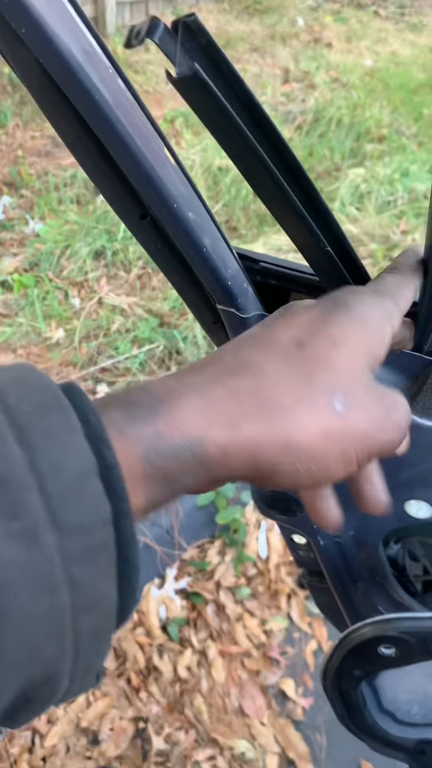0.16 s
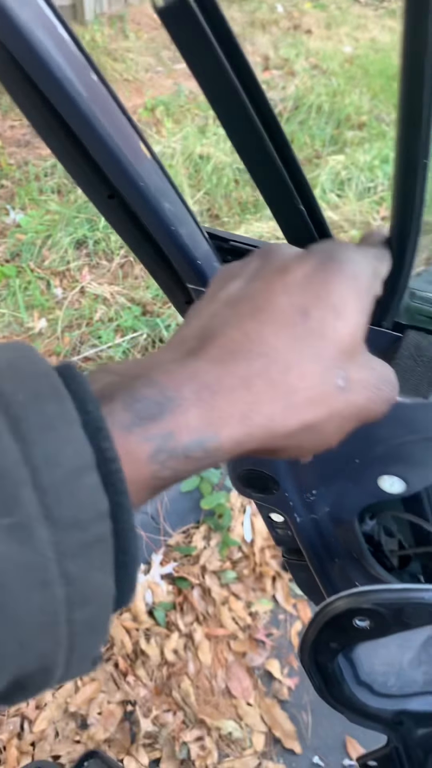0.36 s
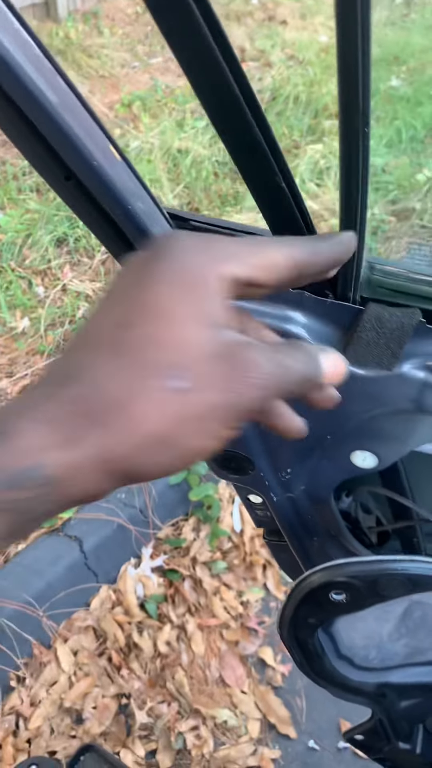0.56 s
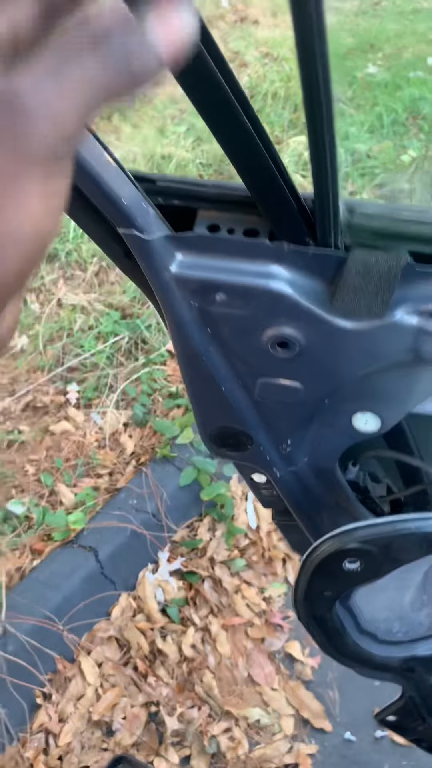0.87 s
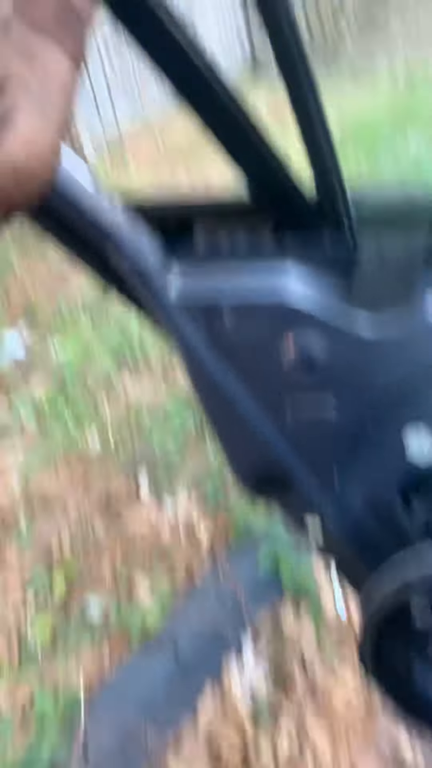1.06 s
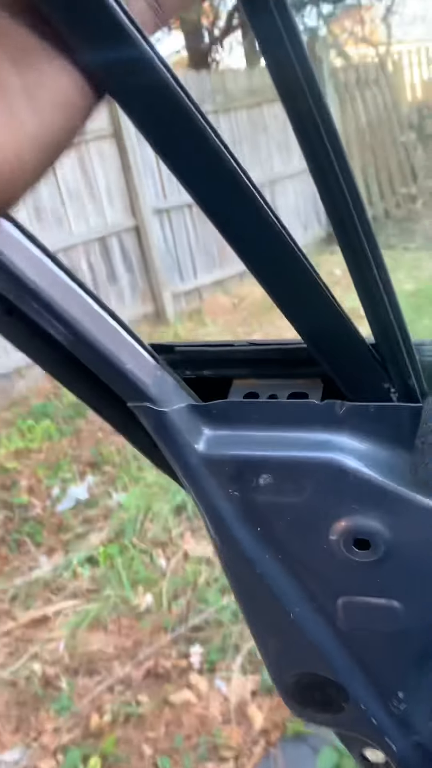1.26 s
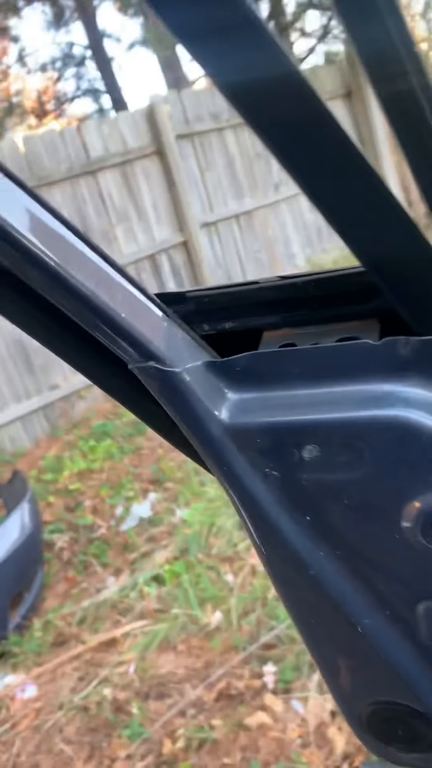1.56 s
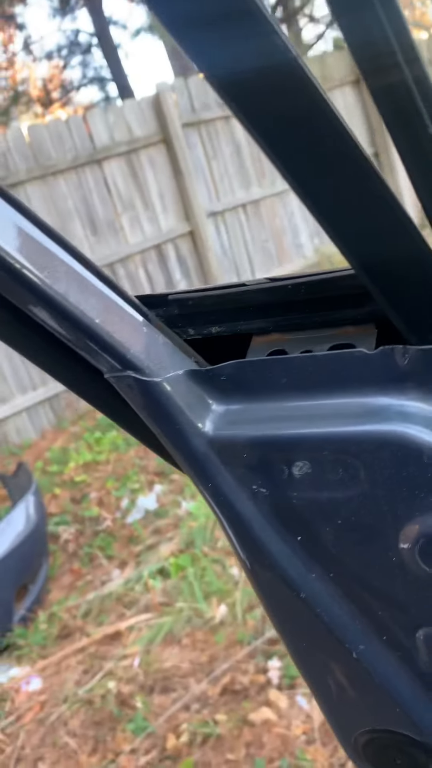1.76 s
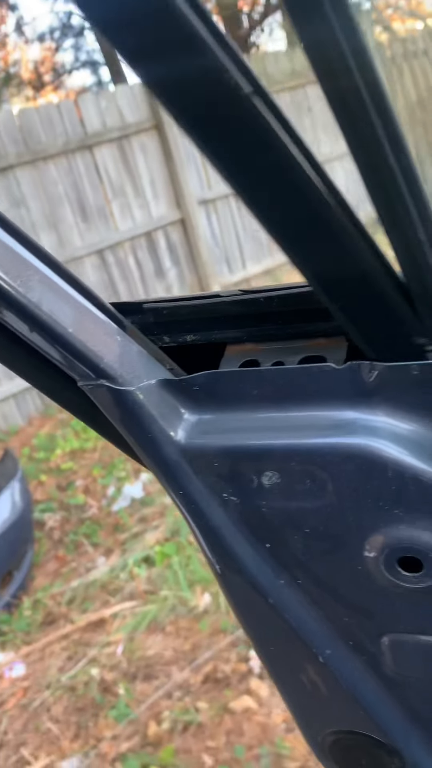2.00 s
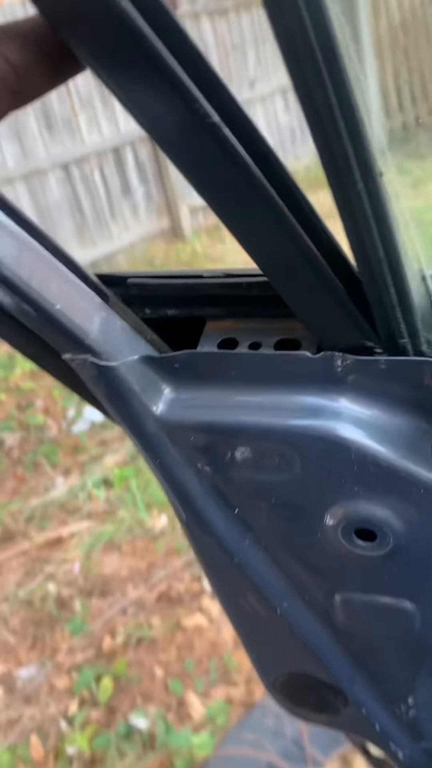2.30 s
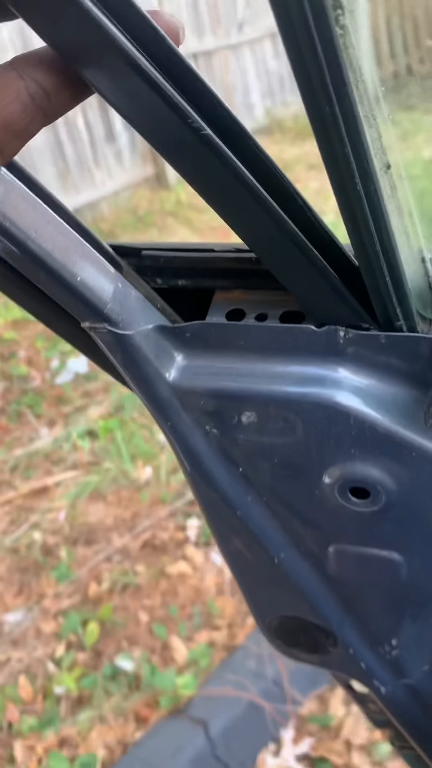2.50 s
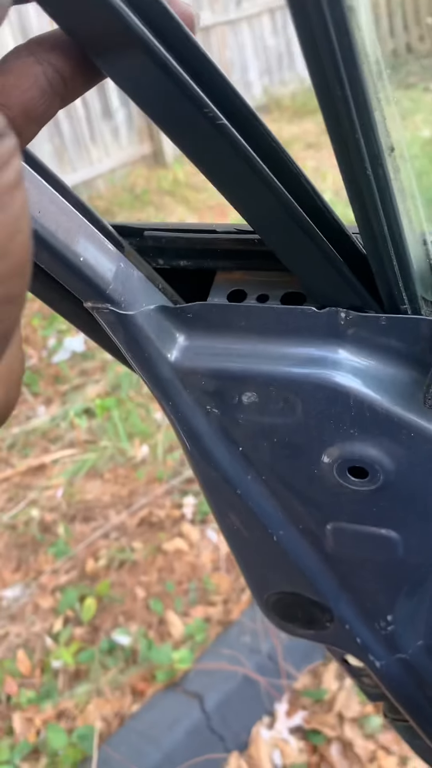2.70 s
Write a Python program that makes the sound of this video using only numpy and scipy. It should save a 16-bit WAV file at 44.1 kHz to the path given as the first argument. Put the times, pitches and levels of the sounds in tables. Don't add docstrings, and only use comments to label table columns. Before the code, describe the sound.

A car door's window channel is tugged by hand: dull hollow knocks early, quieter rubber scraping midway, then firm clicks and thuds; close phone microphone outdoors, faint traffic rumble behind.

```python
import sys
import numpy as np
from scipy import signal
from scipy.fft import rfft, irfft, next_fast_len
from scipy.io import wavfile
from scipy.ndimage import uniform_filter1d, map_coordinates

SR = 44100
rng = np.random.default_rng(int(sys.argv[2]) if len(sys.argv) > 2 else 0)


def waveform_to_disk(signal):
    frames = np.transpose(np.atleast_2d(signal))
    scaled = np.clip(frames, -1, 1) * 32767
    samples = np.round(scaled).astype(np.int16)
    wavfile.write(sys.argv[1], SR, samples)


def gain_from_db(level_db):
    decades = np.asarray(level_db, float) / 20
    return 10 ** decades


N = 125685


def unit(x):
    return x / np.sqrt(np.mean(x ** 2) + 1e-20)


def along(points, hz):
    f, value = np.transpose(points)
    return np.interp(np.log(hz + 1), np.log(f + 1), value)


def wobble(rate):
    knots = rng.standard_normal(int(N * 4000 / SR) + 4)
    return map_coordinates(knots, [np.arange(N) * rate / SR])


def filtered(x, response):
    size = next_fast_len(N + 8192)
    spectrum = rfft(x, size) * response(np.fft.rfftfreq(size, 1 / SR))
    return irfft(spectrum, size)[..., :N]


def coloured(spectrum, grit_db=0, lifts=(), patch_db=0):
    def response(hz):
        lift = sum(db / (1 + ((hz - centre) / width) ** 2) for centre, width, db in lifts)
        return gain_from_db(along(spectrum, hz) + lift)

    cells = signal.stft(rng.standard_normal(N), nperseg=512)[2]
    patches = uniform_filter1d(rng.standard_normal(cells.shape), size=3, axis=0)
    patches = unit(uniform_filter1d(patches, size=8, axis=1))
    noise = signal.istft(cells * gain_from_db(patch_db * patches), nperseg=512)[1][:N]
    return unit(filtered(noise * gain_from_db(grit_db * wobble(1500)), response))


def ring(hz, db, t60, scatter_db, t, spread=0):
    db = db + scatter_db * rng.standard_normal(len(hz))
    decay = gain_from_db(db[:, None] - 60 * t / t60[:, None])
    phase = spread * rng.standard_normal((len(hz), 1))
    return np.sum(decay * np.sin(2 * np.pi * hz[:, None] * t + phase), axis=0)


# t/s, level/dB, sheet clatter/dB, tilt/(dB per half octave)
BLOWS = [(.207, -36, 7, -12.5), (.215, -22.5, -6.5, -3.5), (0.239, -41, -19, 3), (.257, -33, -18, 0.5),
         (.275, -31.5, -23, -5), (.352, -25, 9, 4), (.361, -11, -9.5, 1), (.403, -30, -13, 2.5),
         (.434, -31, -11, -7), (0.547, -33.5, 12, 2), (.556, -16, -7.5, 1.5), (.612, -25.5, -21, 0),
         (.935, -32.5, -1.5, 2), (0.951, -29, -6, 3.5), (1.18, -33, 0.5, 4.5), (1.625, -32.5, -4, 1.5),
         (1.648, -29, -10, 2), (1.689, -33.5, -0.5, -2), (2.055, -30, 1.5, 7), (2.149, -22, 0.5, 2.5),
         (2.168, -25.5, -8, 3), (2.182, -25, -22, -6), (2.196, -25.5, -27, 2.5), (2.357, -28.5, 3, 5),
         (2.505, -28, 2.5, 6.5), (2.522, -26.5, -27, 0), (2.549, -33, -20, -8.5), (2.699, -44.5, 10, 11),
         (.3775, -23, -12, -2.5), (.765, -38, -18, -5), (.885, -41, -3, 6.5), (1.5, -36.5, -2, 2),
         (1.56, -35.5, -11, 2), (.495, -38.5, -14, 2)]
# f/Hz, level/dB, t60/s
SHELL_MODES = [(109, -14.5, 0.17), (147, -16, 0.12), (174.6, -3.5, 0.14), (191.4, -3, 0.14),
               (234.4, -17, 0.22), (260.5, -13, 0.22), (362.6, -17.5, 0.073), (435.6, -16, 0.076)]
# f/Hz, level/dB, t60/s
SHEET_MODES = [(300.5, -16, 0.15), (542, -23, 0.15), (950, -20.5, 0.16), (1234, -29.5, 0.077),
               (2000, -29, 0.072)]


def thuds():
    swell_s, scatter_db, crowd_size = 0.0021, 2, 40
    out, t = np.zeros(N + SR), np.arange(SR // 6) / SR
    hz, mode_db, t60 = np.transpose(SHELL_MODES)
    sheet = np.array(SHEET_MODES)
    lowest, highest = sheet[0, 0], sheet[-1, 0]
    fade = np.clip(20 * (t[-1] - t), 0, 1) ** .5
    envelope = (1 - np.exp(-t / swell_s)) ** 2 * fade
    for s, db, sheet_db, tilt in BLOWS:
        low = ring(hz, mode_db + tilt * 2 * np.log2(hz / hz[3]), t60, scatter_db, t)
        places = (np.arange(crowd_size) + rng.random(size=crowd_size)) / crowd_size
        crowd = lowest + (highest - lowest) * places
        crowd_db, crowd_t60 = along(sheet[:, :2], crowd), along(sheet[:, ::2], crowd)
        high = ring(crowd, sheet_db + crowd_db, crowd_t60, scatter_db, t, np.pi)
        out[round(s * SR):][:len(t)] += gain_from_db(db) * (low + high) * envelope
    return out[:N]


# start t/s, length/s, f/Hz, level/dB
SWAY_SWINGS = [(.21, 0.086, 66, -41), (.58, 0.11, 101, -42.5), (2.2, 0.071, 115, -33.5),
               (2.29, 0.056, 100, -40), (2.5, 0.14, 66, -33.5), (1.43, 0.184, 101, -47.5),
               (.385, 0.0544, 262.4, -30.5), (.572, 0.073, 260, -33), (.356, 0.035, 426, -38.5),
               (.25, 0.053, 210, -37), (.7, 0.047, 258, -41), (1.83, 0.067, 71.4, -40),
               (.208, .03, 165, -31), (1.63, .05, 190, -38), (2.045, .04, 435, -44), (1.62, .05, 355, -46)]


def sways():
    t, out = np.arange(N) / SR, 0
    for s, length, hz, db in SWAY_SWINGS:
        swell = np.sin(np.pi * np.clip((t - s) / length, 0, 1))
        out = out + gain_from_db(db) * swell * np.sin(2 * np.pi * hz * (t - s))
    return out


def blend(dull, a, b):
    dull = np.clip(dull, 0, 1)
    return np.sqrt(1 - dull) * a + np.sqrt(dull) * b


# t/s, level/dB, t60/s, dullness/(0-1)
CHANNEL_HITS = [
    (0.346, -20.5, 0.03, 0.6),
    (0.54, -34.5, 0.07, 0.3),
    (.678, -43, 0.031, 0.82),
    (2.142, -25.5, 0.03, 0.57),
    (2.348, -26.5, 0.034, 0.57),
    (2.495, -41, 0.055, 0.57),
    (1, -50, 0.033, 0.96),
    (2.5, -54, 0.037, .8),
]
# f/Hz, level/dB, t60/s
CHANNEL_MODES = [(2430, -6, .04), (2820, 0, .05), (3320, -3, .04), (5300, -2, .025), (6550, -6, .04),
                 (7500, -8, .03)]
# f/Hz, level/dB
BRIGHT_COLOUR = [(500, 0), (1500, -1.5), (3000, -2), (5000, 0.5), (8000, 2), (12000, -1.5), (16000, -8)]
# f/Hz, level/dB
DULL_COLOUR = [(500, -20), (1500, -12), (2500, -2), (3300, 0), (4600, -4), (7000, -12), (11000, -20),
               (16000, -26)]


def clicks():
    ring_db, rise_s, scatter_db, detune = -11, .002, 3, .015
    out, t = np.zeros(N + SR), np.arange(SR // 8) / SR
    bright, dull = coloured(BRIGHT_COLOUR, grit_db=2.5), coloured(DULL_COLOUR)
    hz, mode_db, life = np.transpose(CHANNEL_MODES)
    for s, db, t60, dullness in CHANNEL_HITS:
        i = round(s * SR)
        crack = blend(dullness, bright[i:][:len(t)], dull[i:][:len(t)]) * gain_from_db(-60 * t / t60)
        bent_hz = hz * (1 + detune * rng.standard_normal(len(hz)))
        tone = gain_from_db(ring_db) * ring(bent_hz, mode_db, life, scatter_db, t)
        out[i:][:len(t)] += gain_from_db(db) * (crack + tone) * (1 - np.exp(-t / rise_s))
    return out[:N]


# start t/s, length/s, level/dB, dullness/(0-1)
RUBBER_STROKES = [(0.164, 0.076, -53.5, 0.22), (0.223, 0.11, -59, 0.98), (0.339, 0.051, -53, 0.5),
                  (0.398, 0.078, -62.5, 1), (.455, 0.076, -47.5, 0.85), (0.519, 0.061, -48, 0.5),
                  (0.841, .12, -62, 0.28), (1.0, 0.093, -66, 0.4), (1.12, 0.11, -60, 0.72),
                  (1.265, 0.042, -59.5, 0), (1.3, 0.13, -65.5, 1), (1.425, 0.082, -55, 1),
                  (1.487, .12, -44, 0.06), (1.595, 0.085, -38.5, 0.04), (1.776, 0.034, -59, 1),
                  (1.93, 0.076, -60.5, 0.5), (2.008, 0.089, -50.5, 0.3), (2.08, 0.08, -56.5, 0.2),
                  (2.121, 0.096, -54, 1), (2.268, 0.06, -43, 1), (2.321, 0.054, -41, 0.93),
                  (2.354, 0.049, -43.5, 0.15), (2.419, 0.057, -51, 0.9), (2.489, 0.033, -43.5, 0.27),
                  (2.559, 0.16, -60.5, 1), (2.668, 0.042, -50, 0.05), (2.722, 0.2, -66.5, 0.33)]
# start t/s, length/s, level/dB, dullness/(0-1)
RUBBER_SNATCHES = [
    (1.924, 0.036, -53, 0.7),
    (1.94, .15, -49, 1),
    (2.283, 0.034, -42, 0.96),
    (0.039, .06, -67.5, 0.66),
    (2.43, 0.031, -58, 0.2),
    (2.305, .04, -43, 1),
    (1.52, .16, -50, 1),
    (1.165, .04, -58, .8),
    (0, .03, -60, .5),
]
# f/Hz, width/Hz, lift/dB
RUBBER_LIFTS = [(1994, 80, 6.5), (2910, 200, 1), (3480, 150, -0.5)]


def strokes():
    fall, grit_db, patch_db, judder_db = .4, 2, 3.2, 1.5
    t = np.arange(N) / SR
    bright = coloured(BRIGHT_COLOUR, grit_db, RUBBER_LIFTS, patch_db)
    dull = coloured(DULL_COLOUR, grit_db, RUBBER_LIFTS, patch_db)
    bright_power, dull_power = np.zeros(N), np.zeros(N)
    for table, rise in ((RUBBER_STROKES, .45), (RUBBER_SNATCHES, .12)):
        for s, length, db, dullness in table:
            u = (t - s) / length
            shape = np.clip(np.minimum(u / rise, (1 + fall / 2 - u) / fall), 0, 1)
            power = gain_from_db(2 * db) * shape ** 2
            dullness = np.clip(dullness, 0, 1)
            bright_power += (1 - dullness) * power
            dull_power += dullness * power
    judder = gain_from_db(judder_db * wobble(59.78))
    return judder * (np.sqrt(bright_power) * bright + np.sqrt(dull_power) * dull)


# start t/s, length/s,
# f/Hz, level/dB
BRIEF_TONES = [(1.534, 0.041, 2000, -50.5), (2.037, 0.082, 6650, -55.5), (2.317, 0.016, 3230, -37),
               (2.275, .035, 3450, -49), (2.285, 0.037, 3200, -45), (2.3, .04, 3200, -48),
               (2.346, 0.011, 3300, -37), (.345, .02, 2870, -43), (.345, .008, 4150, -33),
               (.345, .008, 5600, -34), (.54, 0.013, 6600, -46), (2.141, 0.0095, 5100, -33.5),
               (1.945, 0.058, 3500, -54.5), (2.0, .07, 3250, -55.5), (0.468, 0.053, 3600, -55),
               (1.62, 0.057, 1420, -52.5), (.54, 0.021, 2400, -48), (2.69, 0.13, 460, -53.5),
               (2.13, 0.053, 2023, -44), (2.3, 0.033, 2000, -43)]


def brief_tones():
    t, out = np.arange(N) / SR, 0
    waver = np.cumsum(1 + .012 * wobble(80)) / SR
    flutter = gain_from_db(3.86 * wobble(110))
    for s, length, hz, db in BRIEF_TONES:
        swell = np.sin(np.pi * np.clip((t - s) / length, 0, 1))
        out = out + gain_from_db(db) * swell * np.sin(2 * np.pi * hz * waver)
    return out * flutter


def yard(x):
    t60, delay = .05, 200
    t = np.arange(SR // 8) / SR
    tail = rng.standard_normal((2, len(t))) * gain_from_db(-60 * t / t60)
    tail = tail / np.linalg.norm(tail[0])
    return signal.fftconvolve(np.pad(x, (delay, 0))[None], tail, axes=1)[:, :N]


# t/s, level/dB
TRAFFIC_LEVEL = [(0, -48), (.2, -46), (.3, -45), (.61, -43), (.84, -49.5), (.95, -44), (1.1, -43),
                 (1.29, -46), (1.45, -43.5), (1.59, -42.5), (1.71, -48.5), (1.86, -46), (2.04, -46.5),
                 (2.16, -40.5), (2.45, -43), (2.63, -44.5), (2.79, -44.5), (2.85, -46.5)]
# f/Hz, level/dB
RUMBLE_COLOUR = [(25, -70), (45, -8), (62, 2), (82, -2), (102, 2.5), (135, -8), (220, -12.5), (400, -20.5)]
# f/Hz, level/dB
HISS_COLOUR = [(250, 1.5), (600, -1), (1200, 1), (1700, -7), (2200, -16), (5000, -16), (8000, -34),
               (16000, -75)]
# f/Hz, likeness/(0-1)
PORT_LIKENESS = [(300, 0.49), (800, 0.4), (1800, 0.32), (3000, 0.45), (5000, 0.65)]


def traffic():
    rumble_db, hiss_db = 2.5, -55.5
    pass_s, pass_length_s, pass_db = 1.113, 0.28, 5
    t = np.arange(N) / SR
    level = np.interp(t, *np.transpose(TRAFFIC_LEVEL))
    rumble = gain_from_db(level + rumble_db + 1.33 * wobble(7.71)) * coloured(RUMBLE_COLOUR + [(700, -54)])
    passing = pass_db * np.exp(-((t - pass_s) / pass_length_s) ** 2)
    hiss = np.array([coloured([(120, -55)] + HISS_COLOUR), coloured([(120, -56)] + HISS_COLOUR)])
    hiss = gain_from_db(hiss_db + passing + 2.6 * wobble(4.1)) * hiss

    def shares(hz):
        angle = np.arccos(np.clip(along(PORT_LIKENESS, hz), -1, 1)) / 2
        return np.array([np.cos(angle), np.sin(angle)])

    mid, side = filtered(hiss, shares)
    return rumble + np.array([mid + side, mid - side])


def scene():
    rattle = clicks() + strokes() + brief_tones()
    return thuds() + sways() + rattle + gain_from_db(-11) * yard(rattle) + traffic()


def top_cut(x):
    return signal.sosfilt(signal.butter(12, 16950, fs=SR, output="sos"), x)


# f/Hz, lead/rad
PORT_LEAD = [(0, 0), (340, -.6), (750, -3.14), (1400, -5.6), (2300, -4.2), (3600, -4.7), (4720, -3.14),
             (15300, 12.57)]
# f/Hz, level/dB
PORT_TILT = [(60, -1), (200, -5), (450, -2), (800, -5), (1200, -0.5), (3000, 1)]
# t/s, half length/s
WHOLE_MOMENTS = [
    (.349, .005),
    (.68, .008),
    (1.295, .026),
    (1.505, .028),
    (1.70, .018),
    (1.93, .02),
    (2.145, .005),
    (2.282, .021),
    (2.35, .004),
    (2.495, .006),
]


def record(dry):
    drop_from_hz, top_hz, wide_top_hz, dropped_db = 3600, 15850, 14900, -32
    keep_over, edge, wider = .3, .12, 1.5
    frame, wide_share = 1024, .45

    def lead(hz):
        return np.interp(hz, *np.transpose(PORT_LEAD))

    def ports(hz):
        tilt = along(PORT_TILT, hz) / 2 * np.array([[1], [-1]])
        return gain_from_db(tilt) * np.exp(np.array([[0], [-1j]]) * lead(hz))

    def keep(widening, top):
        def response(hz):
            share = np.abs([np.cos(lead(hz) / 2), np.sin(lead(hz) / 2)])
            needed = widening * keep_over * np.clip(hz / 9500, 0, 1)
            weak = np.clip((needed + edge - share) / edge, 0, 1) * (hz > drop_from_hz)
            above = np.clip((hz - top) / 150, 0, 1)
            return gain_from_db(dropped_db * np.maximum(weak, above))
        return response

    left, right = filtered(dry, ports)
    pair = np.array([left + right, left - right]) / 2
    wide = 1. * (rng.random(N // frame + 1) < wide_share)
    wide = uniform_filter1d(np.repeat(wide, frame)[:N], size=256)
    mid, side = (1 - wide) * filtered(pair, keep(1, top_hz)) + wide * filtered(pair, keep(wider, wide_top_hz))
    thinned = np.array([mid + side, mid - side])
    whole = filtered(np.array([left, right]), lambda hz: hz < top_hz + 300)
    t = np.arange(N) / SR
    sudden = np.clip(sum(np.exp(-((t - s) / half) ** 8) for s, half in WHOLE_MOMENTS), 0, 1)
    return top_cut(sudden * whole + (1 - sudden) * thinned)


dry = scene()
out = record(dry)
waveform_to_disk(out)
```